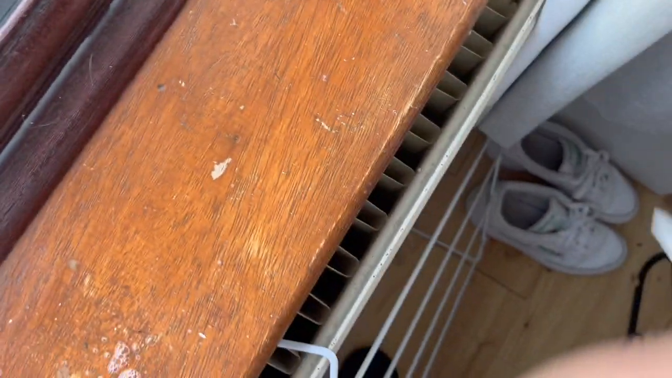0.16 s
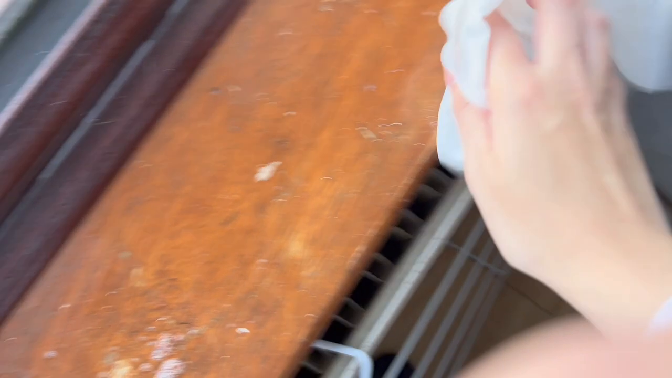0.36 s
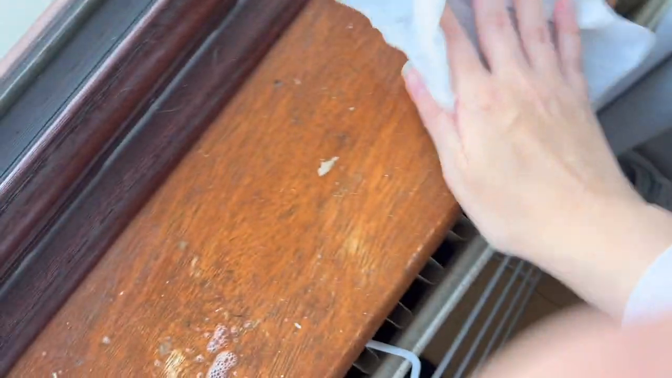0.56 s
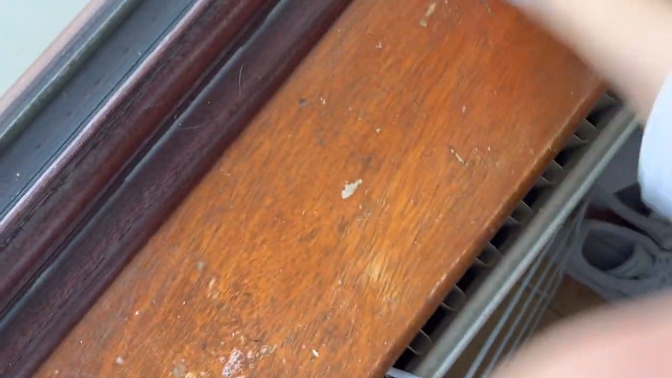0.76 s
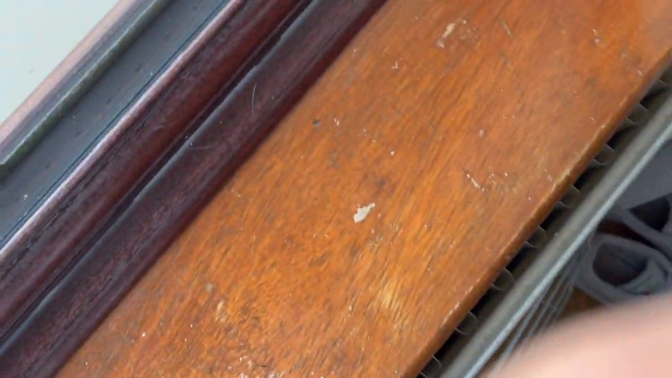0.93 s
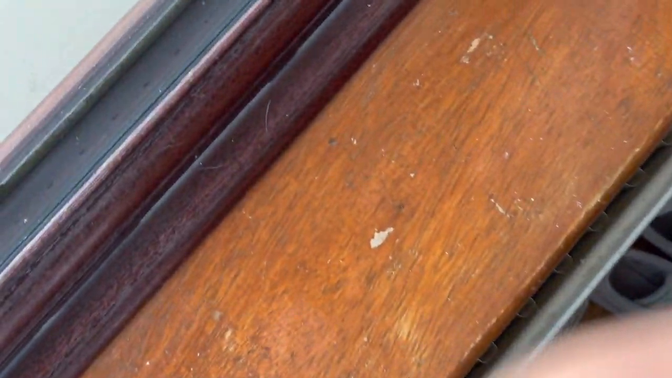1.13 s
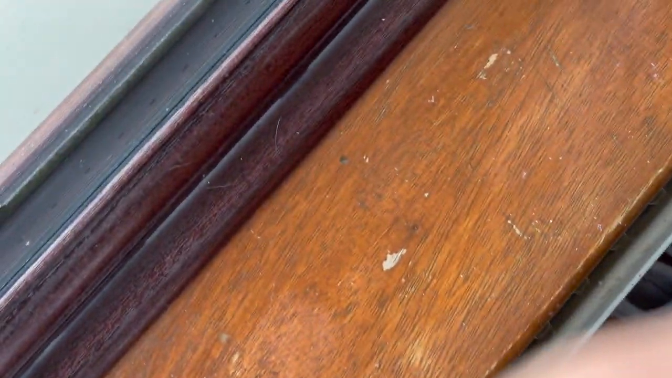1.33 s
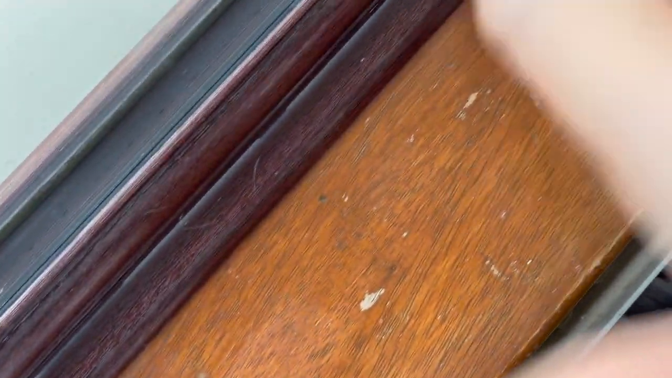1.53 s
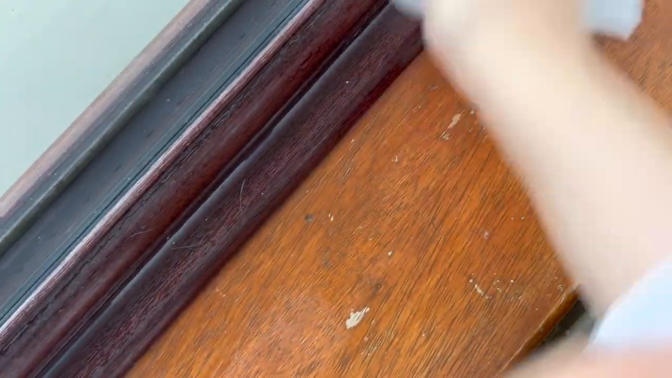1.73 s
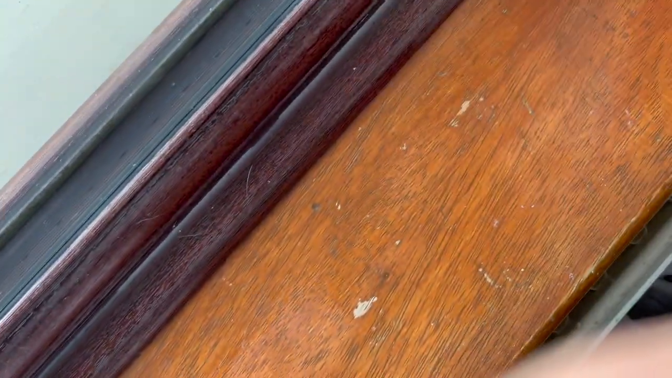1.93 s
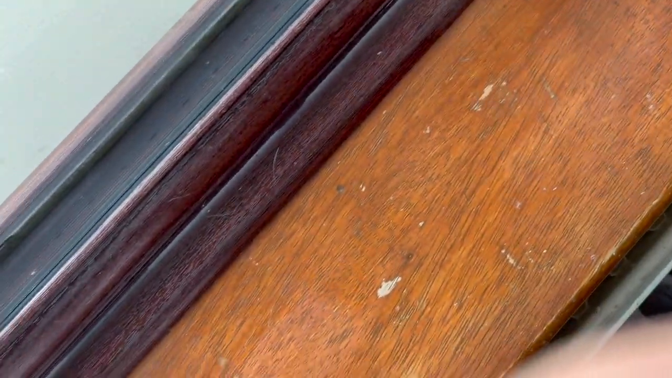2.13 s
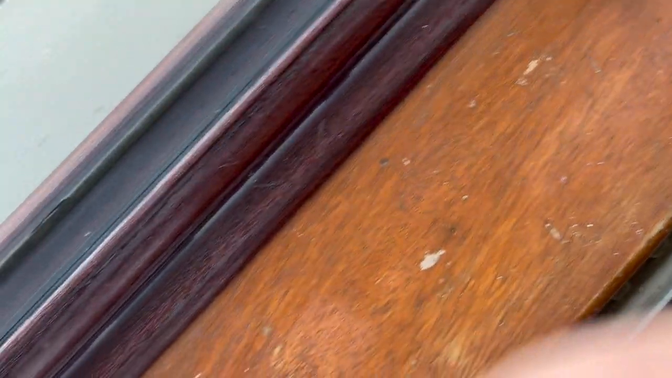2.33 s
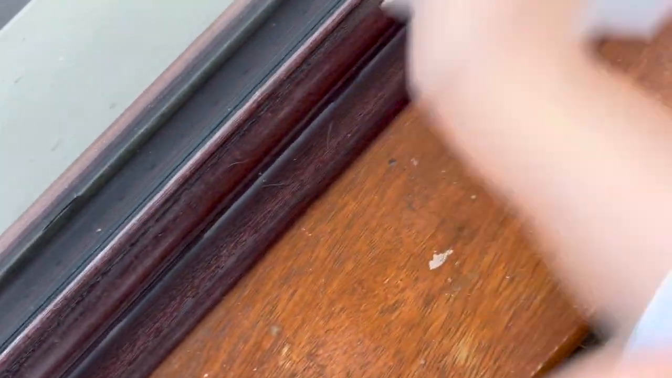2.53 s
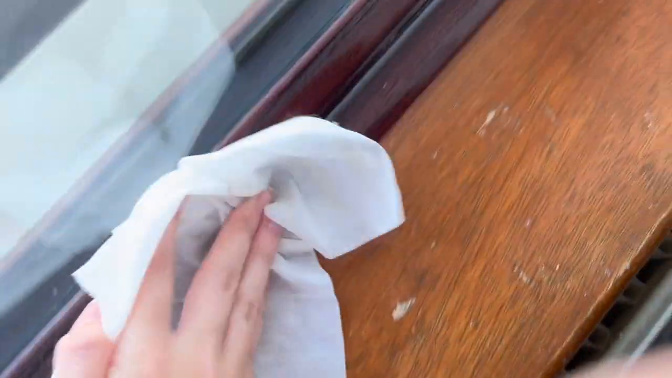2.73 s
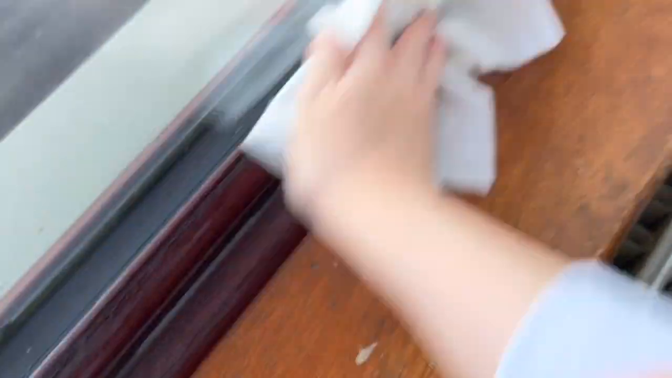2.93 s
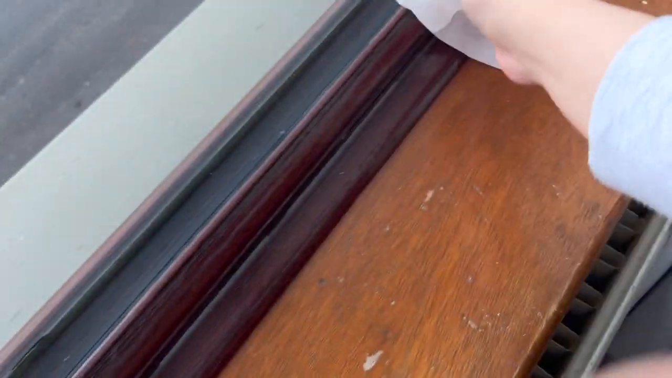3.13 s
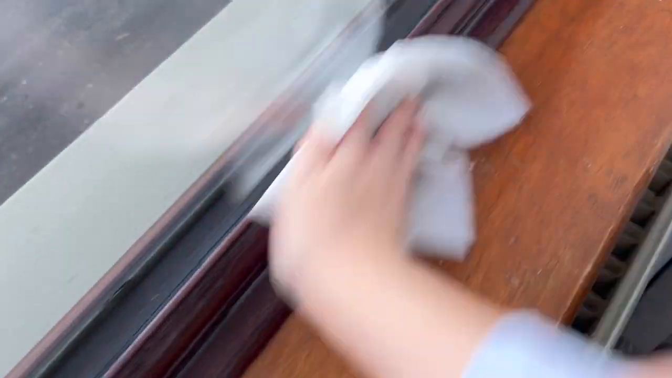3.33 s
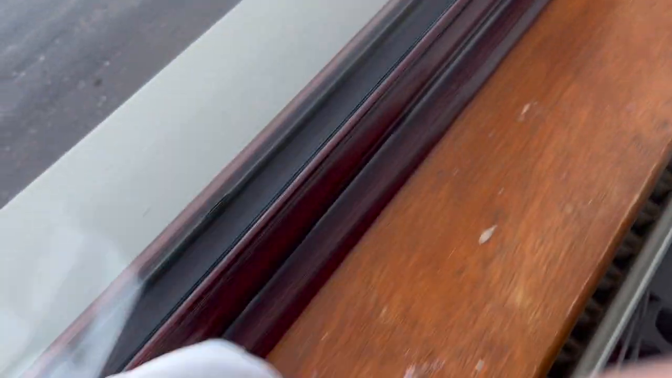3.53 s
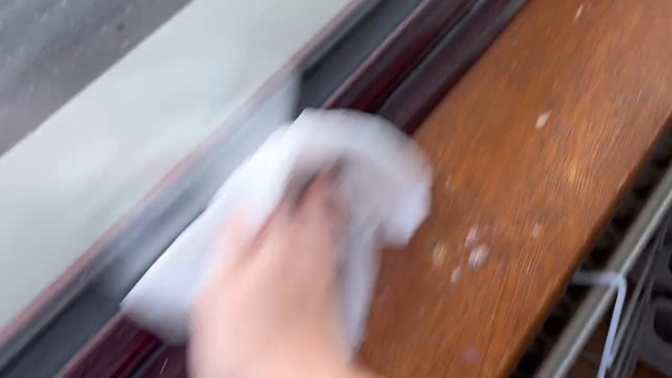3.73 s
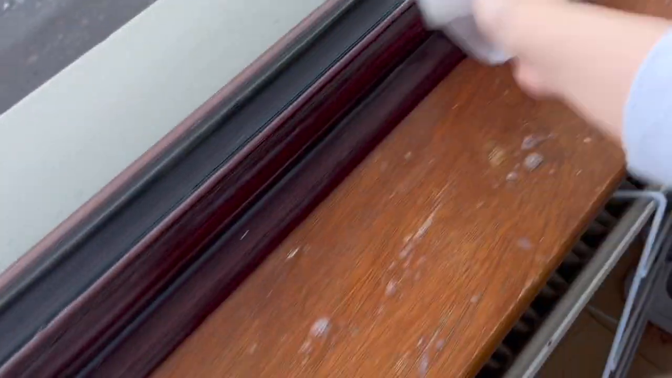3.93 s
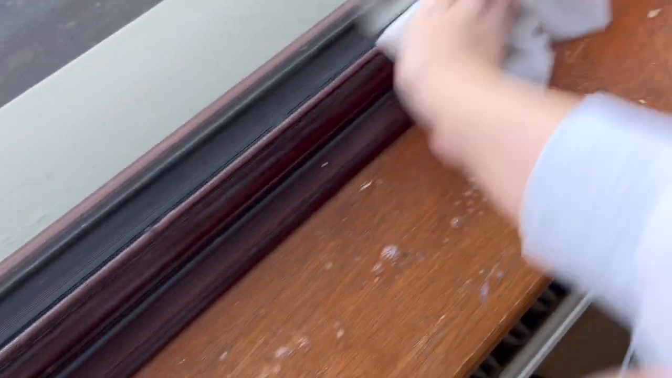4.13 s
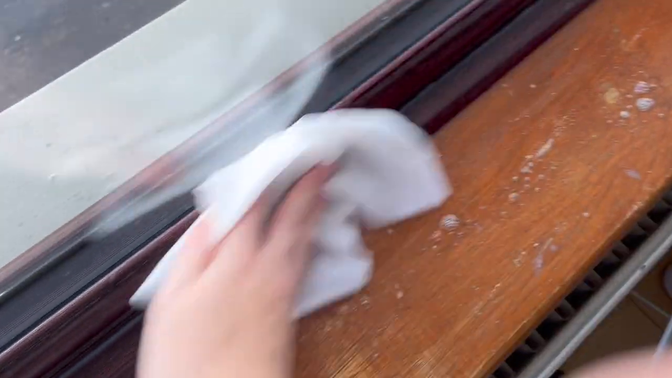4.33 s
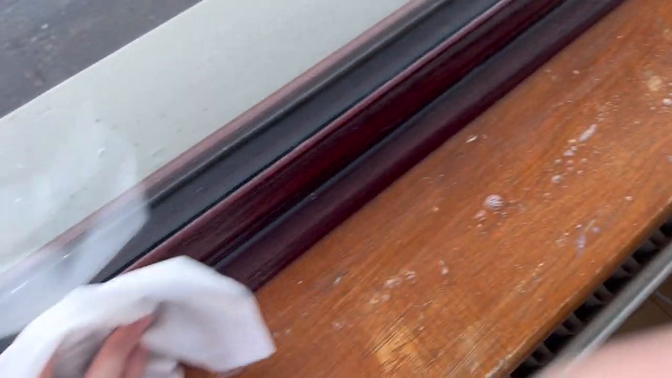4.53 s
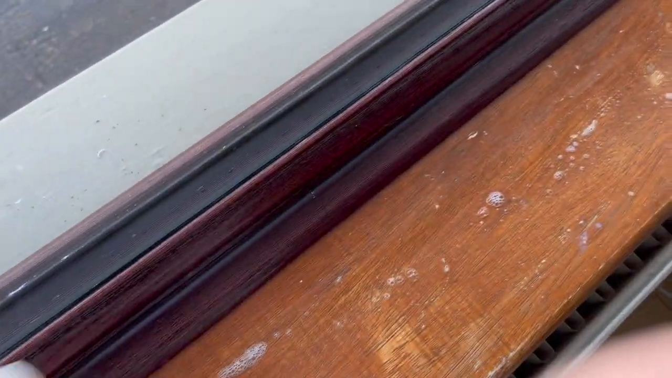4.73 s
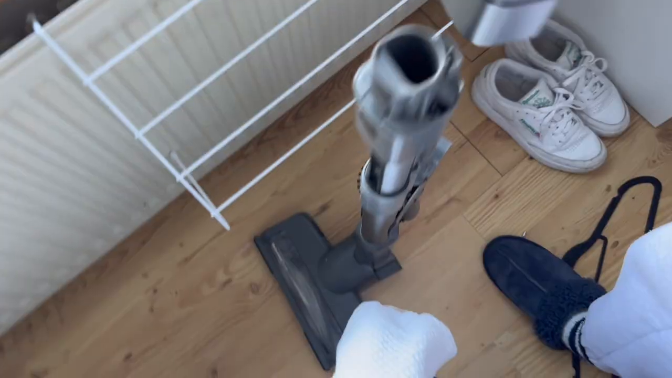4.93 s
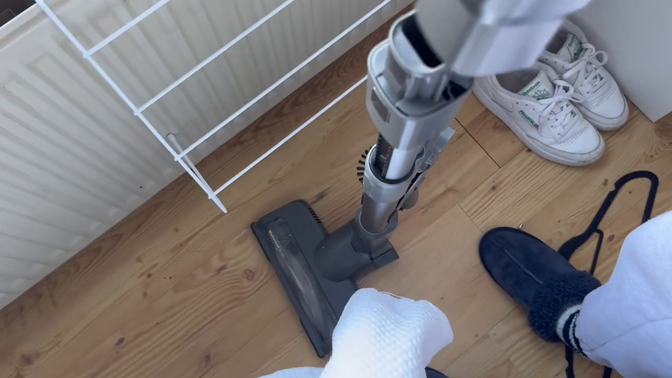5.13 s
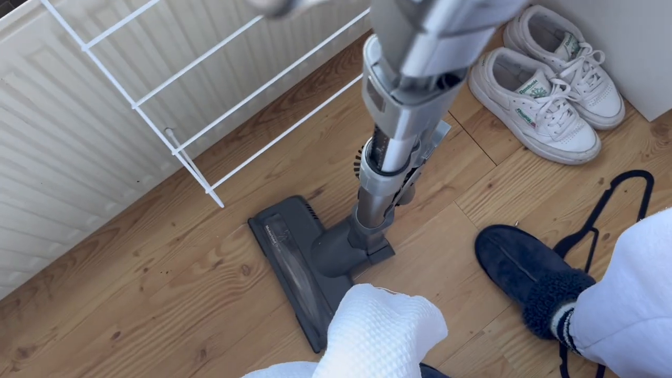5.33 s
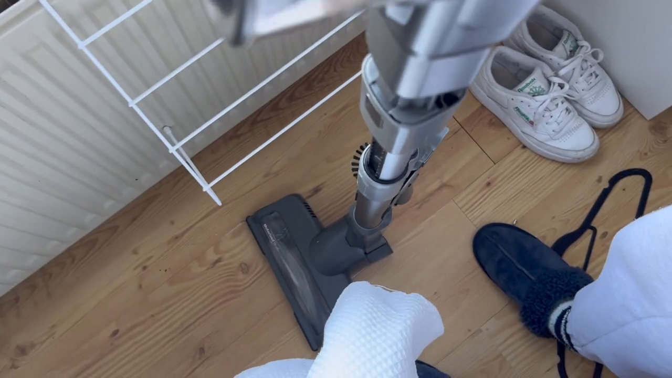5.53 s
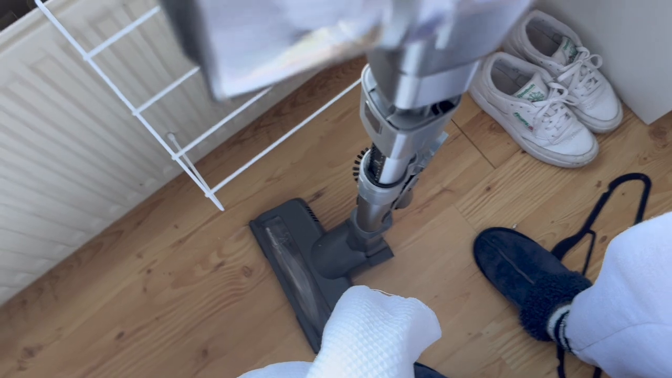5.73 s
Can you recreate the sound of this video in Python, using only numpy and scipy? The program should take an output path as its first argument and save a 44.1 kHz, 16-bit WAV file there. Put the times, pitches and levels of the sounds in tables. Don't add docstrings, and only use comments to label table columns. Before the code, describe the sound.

Close, breathy cloth rubbing on wood with dull knuckle knocks, cutting to a quiet room and two loud plastic clacks.

```python
import sys
import numpy as np
from scipy import signal
from scipy.fft import rfft, irfft, next_fast_len
from scipy.io import wavfile
from scipy.ndimage import uniform_filter1d

SR = 44100
rng = np.random.default_rng(int(sys.argv[2]) if len(sys.argv) > 2 else 0)


def invert_db(x):
    u = np.asarray(x, float) / 20
    return 10 ** u


def put_to_file(sound):
    columns = np.atleast_2d(sound).T
    safe = np.clip(columns, -1, 1)
    whole_steps = np.round(safe * 32767)
    wavfile.write(sys.argv[1], SR, whole_steps.astype(np.int16))


N = 258859
T = np.arange(N) / SR
PAD = next_fast_len(N + SR // 4)
HZ = np.fft.rfftfreq(PAD, 1 / SR) + 1e-3

# (time [s], peak [dB], pitch [Hz], contact [dB])
KNUCKLE_BUMPS = [(0.189, -51.5, 189, -60.5), (0.211, -43, 139, -67), (0.266, -50, 133, -75),
                 (0.343, -50, 167, -61), (0.379, -46, 185, -64), (1.019, -44, 145, -79),
                 (2.144, -45.5, 207, -64), (2.172, -40, 138, -81), (2.206, -44.5, 110, -70),
                 (2.315, -52, 186, -54), (2.333, -39.5, 193, -55), (2.371, -32.5, 148, -51),
                 (2.542, -51, 355, -68), (2.666, -43, 245, -52), (2.685, -42, 214, -54),
                 (3.1647, -34.5, 319, -50), (3.175, -42, 289, -47.5), (3.182, -42, 190, -50),
                 (3.193, -45, 240, -56), (3.206, -49, 149, -59), (3.249, -41.5, 323, -66),
                 (4.6955, -34, 282, -45), (4.7066, -38, 248, -55), (4.7286, -33, 258, -46),
                 (4.479, -51, 330, -62), (4.748, -48, 298, -60), (4.736, -35, 170, -58),
                 (4.689, -52, 400, -47), (2.81, -48, 266, -63), (2.935, -62, 202, -67),
                 (3.015, -56, 205, -55.5)]
# (fastest [s], rise [s], fall [s], fibre hiss [dB])
CLOTH_STROKES = [(0, .2, 0.12, -77.5), (.235, 0.088, 0.16, -70), (.45, 0.17, 0.21, -72),
                 (0.639, 0.14, 0.17, -62), (.79, 0.1, 0.24, -75.5), (.96, 0.092, 0.23, -69.5),
                 (1.14, 0.088, 0.14, -70), (1.33, 0.12, 0.084, -70), (1.5, 0.18, 0.11, -61.5),
                 (1.73, 0.23, 0.17, -67), (2.03, 0.37, 0.22, -69.5), (2.27, 0.14, 0.077, -71.5),
                 (2.36, 0.066, 0.26, -70), (2.58, 0.26, 0.19, -63.5), (2.82, 0.24, .18, -68),
                 (3.02, 0.18, 0.11, -71.5), (3.26, 0.14, 0.07, -69.5), (3.419, 0.23, 0.16, -61),
                 (3.7, 0.13, 0.23, -68.5), (3.84, 0.31, 0.15, -73.5), (4.05, 0.24, 0.27, -77.5),
                 (4.2, 0.17, 0.22, -65), (4.38, 0.13, 0.16, -67), (4.55, 0.2, 0.19, -66),
                 (4.72, 0.093, 0.14, -68.5), (4.88, 0.2, 0.25, -67)]


def walk(rate):
    k = int(SR / rate)
    held = np.repeat(rng.standard_normal(N // k + 1), k)
    return 1.27 * uniform_filter1d(uniform_filter1d(held, k), k)[:N]


def colour(x, shape):
    hz, db = np.transpose(shape)
    return rfft(x, PAD) * invert_db(np.interp(np.log(HZ), np.log(hz), db, -90, -90))


def bands(shape, gain_db):
    full = colour(rng.standard_normal((2, N)), shape)
    full /= np.std(irfft(full, PAD))
    out = np.zeros((2, N))
    lowest, highest = int(3 * np.log2(shape[0][0])), int(3 * np.log2(shape[-1][0])) + 1
    for k in range(lowest, highest + 1):
        bell = np.cos(np.pi / 2 * np.clip(3 * np.log2(HZ) - k, -1, 1)) ** 2
        out += irfft(full * bell, PAD)[:, :N] * invert_db(gain_db(2 ** (k / 3)))
    return out


def hump(hz, centre_hz, db, width):
    return db * (np.exp(-(np.log(hz / centre_hz) / width) ** 2) - .4)


def ring(push, modes):
    out = np.zeros(N)
    for k, (hz, db, t60) in enumerate(modes):
        pole = np.exp(2j * np.pi * hz / SR - np.log(1000) / (t60 * SR))
        out += (-1) ** k * invert_db(db) * signal.lfilter([1], [1, -pole], push).imag
    return out


def swell(t, fastest, rise, fall):
    return np.sin(np.pi / 2 * np.interp(t, [fastest - rise, fastest, fastest + fall], [0, 1, 0]))


def strokes(levels_db, law, creep_db, centres_hz=None):
    power, centre = np.full(N, invert_db(2 * creep_db)), np.zeros(N)
    for k, (fastest, rise, fall, _) in enumerate(CLOTH_STROKES):
        share = invert_db(2 * levels_db[k]) * swell(T, fastest, rise, fall) ** (2 * law)
        power += share
        centre += share * (0 if centres_hz is None else centres_hz[k])
    return 10 * np.log10(power), np.maximum(centre / power, 100)


def room():
    # (frequency [Hz], t60 [s])
    decay = [(100, 0.72), (300, 0.32), (600, 0.36), (2000, 0.22), (6000, 0.23), (14000, 0.13)]
    hz, t60 = np.transpose(decay)
    shape = [(40, -12), (200, -7), (500, 0), (16000, -.1)]
    tail = bands(shape, lambda f: -60 * T / np.interp(np.log(f), np.log(hz), t60))[:, :SR]
    tail *= 1 - np.exp(-(T[:SR] / 0.012) ** 2)
    return tail / np.sqrt(np.sum(tail ** 2) / 2)


def paths(x, tail, wet_db, scatter_s):
    scatter = rng.standard_normal(SR) * np.exp(-T[:SR] / scatter_s)
    early = np.array([T[:SR] == 0, scatter / np.sqrt(np.sum(scatter ** 2))])
    return signal.fftconvolve(np.atleast_2d(x), early + invert_db(wet_db) * tail, axes=1)[:, :N]


def ports(pair, table):
    hz, *columns = np.transpose(table)
    turn, like, pan_db = (np.interp(HZ, hz, c) for c in columns)
    first, second = rfft(pair, PAD)
    right = like * np.exp(1j * np.pi * turn) * first + np.sqrt(1 - like ** 2) * second
    return irfft([first * invert_db(pan_db / 2), right * invert_db(-pan_db / 2)], PAD)[:, :N]


def room_tone(change_s):
    # (frequency [Hz], spectral level [dB per Hz])
    quiet = [(25, -16), (50, 4), (100, 1.5), (200, -7.5), (400, -6.5), (700, -12.5), (1400, -19.5),
             (2600, -28), (5000, -30.5), (9000, -35), (14000, -44)]
    level_db = -79 + 7.5 * np.exp(-abs(T - change_s) / 0.08)
    return bands(quiet, lambda hz: level_db + 5.5 + 1.9 * walk(4.5))


def rocks():
    # (time [s], peak [dB], pitch [Hz], length [s])
    foot_rocks = [
        (5.632, -46, 125, .016),
        (5.655, -51, 100, .02),
        (5.678, -60, 110, .016),
    ]
    out = np.zeros(N)
    for s, db, hz, length in foot_rocks:
        window = np.sin(np.pi * np.clip((T - s) / length, 0, 1))
        out += invert_db(db) * np.sin(2 * np.pi * hz * (T - s)) * window
    return out


def grip_rumble():
    # (frequency [Hz], spectral level [dB per Hz])
    hand = [(20, -59), (40, -0.5), (65, 2), (110, -1.5), (190, -7), (300, -16.5), (500, -27)]
    rest_db, per_bump_db, fade_s, rise_s = -68.5, -24.5, 0.061, 0.0045
    power = np.full(N, invert_db(2 * rest_db))
    for s, db, *_ in KNUCKLE_BUMPS:
        fade = np.exp(-((T - s) / fade_s) ** 2)
        power += invert_db(2 * (db + per_bump_db)) * fade * np.clip((T - s) / rise_s, 0, 1)
    hand_db = 10 * np.log10(power)
    jolt = 1.8 * walk(22.2)
    return bands(hand, lambda hz: hand_db + 0.14 + jolt + 3.95 * walk(11))


def ticks():
    # (time [s], peak [dB], pitch [Hz])
    specks = [(0.1862, -51, 1060), (0.2155, -53, 1810), (0.9756, -41, 2500), (1.02, -55, 4530),
              (2.313, -56, 4800), (2.3278, -47, 1100), (2.6752, -58, 3740), (3.1635, -54, 1150),
              (4.169, -38, 3300), (4.24, -49, 3152), (4.676, -47, 1990), (4.685, -44.5, 3280),
              (4.691, -43.5, 1910), (4.7267, -45.5, 1700), (4.8724, -53.5, 3340), (4.91, -48, 3580)]
    out, t = np.zeros(N), T[:SR // 4]
    for s, db, hz in specks:
        burst = rng.standard_normal(len(t)) * 1000 ** (-t / 0.03)
        tone = signal.lfilter(*signal.iirpeak(hz, .8, SR), burst)
        out[int(s * SR):][:len(t)] += invert_db(db + 2) * tone / abs(tone).max()
    return out


def scrapes():
    # (loudest [s], rise [s], fall [s], level [dB], pitch [Hz])
    catches = [(.245, 0.062, 0.043, -63.5, 1880), (.62, 0.085, 0.13, -60, 688),
               (.63, 0.11, 0.12, -64.5, 362), (.62, 0.11, 0.089, -60.5, 517),
               (1.93, 0.065, 0.083, -77, 736), (2.55, .05, 0.041, -64, 393), (2.85, 0.2, 0.092, -66, 480),
               (3.0, 0.068, 0.1, -66.5, 644), (.95, .08, .08, -69, 2290), (1.5, 0.054, .08, -63.5, 2480),
               (1.02, 0.024, 0.087, -61, 4530), (1.46, 0.069, 0.073, -63.5, 1460),
               (1.5, 0.13, 0.11, -66.5, 560), (1.95, .2, .15, -69, 894), (2.34, 0.049, 0.23, -63, 4480),
               (2.385, 0.032, 0.041, -61.5, 900), (3.39, .1, 0.087, -58, 3350),
               (4.22, 0.096, 0.1, -60.5, 3120), (4.26, 0.16, 0.14, -67, 987),
               (4.89, 0.074, 0.061, -63.5, 3280)]
    out, noise = np.zeros((2, N)), rng.standard_normal((2, N))
    for s, rise, fall, db, hz in catches:
        at = slice(int((s - rise) * SR), int((s + fall) * SR))
        peak = signal.iirpeak(hz, 7.1, SR)
        tone = signal.lfilter(*peak, signal.lfilter(*peak, noise[:, at]))
        out[:, at] += invert_db(db) * tone / np.std(tone) * swell(T[at], s, rise, fall)
    return out


def bumps():
    # (time [s], peak [dB], pitch [Hz])
    jolts = [(0.021, -54, 101), (0.096, -47, 86), (0.436, -53, 70.6), (0.874, -45.5, 115),
             (0.935, -48, 65.3), (0.974, -48.5, 88), (1.12, -48, 85), (1.869, -50, 58.4), (4.44, -47, 58),
             (4.496, -40, 66), (4.513, -34.5, 66), (4.545, -43, 66), (4.575, -39.5, 66), (4.605, -45, 70),
             (4.636, -42, 89), (4.655, -44, 69), (0.67, -52.5, 85), (2.75, -46.5, 75), (2.88, -57.5, 69),
             (3.72, -62, 54.7)]
    # (frequency [Hz], level [dB], t60 [s])
    wood = [(314, 0.5, 0.02), (389, -5, 0.034), (504, 0.5, 0.03), (595, -5.5, 0.027), (717, -4, 0.016)]
    # (frequency [Hz], level [dB], t60 [s])
    sway_modes = [(51, 7, 0.048), (66, -8, 0.79), (88, 7, 0.11)]
    jolt_contact_db = -66
    out, contact, sway, t = np.zeros(N), np.zeros(N), np.zeros(N), T[:SR // 4]
    for s, db, hz, contact_db in [(*row, jolt_contact_db) for row in jolts] + KNUCKLE_BUMPS:
        at = slice(int(s * SR), int(s * SR) + len(t))
        t60 = 0.02 * (1 + (202 / hz) ** 2)
        sway_db = db - 7 - 0.0363 * hz
        pitch_hz = hz * (0.86 + min(hz / 140, 1.15) * np.exp(-t / 0.0028))
        wave = np.sin(2 * np.pi * np.cumsum(pitch_hz) / SR) * (1 - np.exp(-t * hz * 3.66))
        out[at] += invert_db(db + 3) * wave * 1000 ** (-t / t60)
        contact[at] += invert_db(contact_db) * rng.standard_normal(len(t)) * np.exp(-t / 0.0058)
        sway[at] += invert_db(sway_db) * np.exp(-t / 0.0094) / (0.002 * SR)
    rattle = signal.sosfilt(signal.butter(2, [300, 1100], "band", fs=SR, output="sos"), contact)
    return out + invert_db(7.5) * rattle + invert_db(-17.5) * ring(contact, wood) + invert_db(-4.0) * ring(sway, sway_modes)


def wiping():
    # (frequency [Hz], spectral level [dB per Hz])
    fibre = [(5000, -25), (6500, -4.5), (8500, 6.5), (10500, -1), (12000, -2), (14000, -1.5), (16000, -6)]
    rub_skirt = [(900, -47), (1500, -1), (2000, 2), (3500, 0.5), (5000, 0), (7000, -3), (9000, -7.5)]
    board_hum = [(150, 6.5), (300, 2), (500, 0), (800, -0.5), (1200, 0), (1700, -2.5), (2400, -8.5)]
    # (rub [dB], rub centre [Hz], board [dB], board centre [Hz])
    press = [(-70, 6200, -72.5, 480), (-60.5, 1200, -64, 250), (-59.5, 3250, -70, 530),
             (-57.5, 3700, -60.5, 460), (-63.5, 1700, -67, 390), (-59, 3300, -62.5, 510),
             (-64.5, 2800, -68, 640), (-68.5, 3900, -78.5, 1600), (-57, 2650, -65, 1170),
             (-62.5, 2150, -77, 1750), (-60, 2600, -63.5, 750), (-66, 2700, -67, 92),
             (-63, 4900, -66.5, 1560), (-55.5, 3900, -61, 520), (-62, 3000, -65.5, 480),
             (-69.5, 3400, -67.5, 660), (-64, 5000, -63.5, 240), (-54.5, 3200, -65, 640),
             (-63.5, 3600, -76.5, 790), (-70, 2900, -71.5, 890), (-69, 3000, -66, 550),
             (-56, 3900, -64.5, 560), (-61, 2500, -65, 550), (-63.5, 3900, -71, 570),
             (-65, 3200, -73.5, 840), (-62.5, 3700, -71.5, 580)]
    rub_db, rub_hz, board_db, board_hz = np.transpose(press)
    hiss_db, _ = strokes(np.transpose(CLOTH_STROKES)[-1], law=1, creep_db=-92)
    rub_db, rub_hz = strokes(rub_db, 1, -76.5, rub_hz)
    board_db, board_hz = strokes(board_db, 1.26, -78, board_hz)
    drag = 1.02 * walk(14) + 0.9 * walk(400)
    hiss = bands(fibre, lambda hz: hiss_db + 5.5 + drag + 0.73 * walk(6.8))
    rub = bands(rub_skirt, lambda hz: rub_db + drag + 1.2 * walk(9) + hump(hz, rub_hz, 3.9, 0.24))
    board = bands(board_hum, lambda hz: (board_db + 2.5 + drag + 1.0 * walk(9.9)
                                         + hump(hz, board_hz, 8.2, 0.58)))
    return hiss + rub + board


def tube():
    # (time [s], click [dB], shell [dB], floor thud [dB])
    knocks = [(4.9863, -56, -52, -74.5), (4.9893, -52, -58, -78), (4.994, -67, -59, -75),
              (5.001, -61, -61, -69.5), (5.033, -61, -63.5, -74), (5.039, -73, -62.5, -74),
              (5.046, -66, -63.5, -79.5), (5.326, -29.5, -41.5, -39), (5.3285, -35.5, -38.5, -47.5),
              (5.3357, -43, -36, -35.5), (5.3478, -18, -22.5, -33.5), (5.3507, -23.5, -27, -30.5),
              (5.3529, -18, -27.5, -23), (5.3548, -15.5, -27, -28), (5.3574, -23, -25.5, -29),
              (5.3608, -26, -31, -38.5), (5.367, -34, -32, -28), (5.3707, -35.5, -39, -41),
              (5.3779, -40, -35, -44.5), (5.392, -48.5, -38.5, -41), (5.4195, -39.5, -40.5, -43.5),
              (5.4628, -28, -34.5, -27), (5.4662, -33, -30.5, -27.5), (5.4739, -37, -41, -40),
              (5.4775, -24, -28, -32.5), (5.48, -27, -27.5, -31), (5.488, -43.5, -36, -30.5),
              (5.502, -50.5, -47, -55), (5.5167, -46, -53, -43.5), (5.625, -68.5, -62, -66.5),
              (5.793, -75.5, -61.5, -80)]
    # (frequency [Hz], level [dB], t60 [s])
    click_modes = [(1725, 1, 0.022), (1980, -8.5, 0.024), (2170, -9, 0.011), (2374, -6.5, 0.013),
                   (2740, -8.5, 0.0072), (3030, -6.5, .009), (3320, -8, .009), (3745, -10, .008),
                   (4525, -14.5, .008), (4890, -14, .007)]
    shell_modes = [(492, -4.5, 0.042), (560, -6.5, 0.081), (672, 2, 0.026), (750, -3.5, .05),
                   (945, 1.5, 0.013), (1154, -4.5, 0.018)]
    thud_modes = [(69, -12.5, 0.1), (122, 1, 0.075), (193, 1, 0.058), (262, -5, 0.04), (330, -1, 0.056)]
    # (frequency [Hz], spectral level [dB per Hz])
    crack_shape = [(300, -8), (1000, -9), (1450, -12), (2000, -2), (3200, 0.5), (5000, -6.5), (7000, -14.5),
                   (10500, -18), (15700, -21.5)]
    # (click [dB], top [Hz])
    soft = [(-52, 2500), (-45, 15000)]
    # (click [dB], share [0-1])
    faint_ring = [(-52, .25), (-45, 1)]
    (click, struck, shell, thud), t = np.zeros((4, N)), T[:1500]
    for s, click_db, shell_db, thud_db in knocks:
        rattle = rng.standard_normal(len(t)) * np.exp(-t / 0.0018)
        rattle /= np.sqrt(np.sum(rattle ** 2))
        at = slice(int(s * SR), int(s * SR) + len(t))
        top = signal.butter(2, np.interp(click_db, *np.transpose(soft)), fs=SR)
        contact = invert_db(click_db) * signal.lfilter(*top, rattle + 0.44 * (t == 0))
        click[at] += contact
        struck[at] += contact * np.interp(click_db, *np.transpose(faint_ring))
        shell[at] += invert_db(shell_db) * (.5 * rattle + (t == 0))
        thud[at] += invert_db(thud_db) * np.exp(-t / 0.00084) / (0.0011 * SR)
    clatter_db, clatter_s = -0.5, 0.013
    energy = signal.lfilter([1], [1, -np.exp(-2 / (clatter_s * SR))], click ** 2)
    shake = np.sqrt(energy / (clatter_s * SR)) * rng.standard_normal(N)
    crack = irfft(colour(click + invert_db(clatter_db) * shake, crack_shape), PAD)[:N]
    plastic = invert_db(-7.0) * ring(struck, click_modes) + invert_db(14.5) * crack
    return plastic + invert_db(-5.0) * ring(shell, shell_modes) + invert_db(3.0) * ring(thud, thud_modes)


def scene():
    # (frequency [Hz], phase turn of right against left [half turns], likeness [0-1], left minus right [dB])
    ports_sill = [(120, 0, .97, 0), (250, 0, .87, 0), (900, 0, .1, 3), (1600, 0, .2, -1), (1750, 0, .97, 0),
                  (3000, -.28, .75, 2), (4500, -.16, .6, 4), (5300, .22, .35, 3), (6900, .5, .65, 1),
                  (7700, 1, 1, 0), (8900, 1, 1, 0), (10200, 1.5, .6, 0), (11000, 2, 1, 0), (12800, 2, 1, 0),
                  (13700, 2.4, .55, 0), (14500, 3, 1, 0)]
    ports_tube = [(650, 0, 1, 0), (1200, -.05, .93, -1.5), (1700, -.1, .9, -2.5), (2600, -.35, .7, -3),
                  (3300, -.55, .6, -3.5), (4200, -.3, .6, -3.5), (5300, -.4, .7, -2), (5750, -1, 1, 0),
                  (6300, -1, 1, 0), (7600, -2, 1, 0), (8500, -2, 1, 0), (9500, -3, 1, 0), (10500, -3, 1, 0),
                  (11600, -4, 1, 0), (12600, -4, .9, 0), (14800, -5, .9, 0)]
    change_s = 4.94
    before = np.clip((change_s - T) / 0.0059, 0, 1)
    tail = room()
    hits = paths(bumps() + ticks(), tail, wet_db=-13.5, scatter_s=0.0076)
    sill = ports(wiping() + grip_rumble() + scrapes() + hits, ports_sill)
    knocks = invert_db(2.5) * np.array([tube(), tube()])
    clicks = paths(knocks, tail, wet_db=-18.5, scatter_s=0.00003)
    after = ports(room_tone(change_s) + rocks() + clicks, ports_tube)
    direct = signal.lfilter(*signal.butter(2, 4300, "high", fs=SR), knocks[0])
    after = after + invert_db(-11.5) * direct
    return before * sill + (1 - before) * after


def low_pass(x):
    return signal.sosfilt(signal.butter(12, 15750, fs=SR, output="sos"), x)


def record(dry):
    mix = signal.sosfilt(signal.butter(2, 41, "high", fs=SR, output="sos"), dry)
    return low_pass(mix)


dry = scene()
out = record(dry)
put_to_file(out)
```